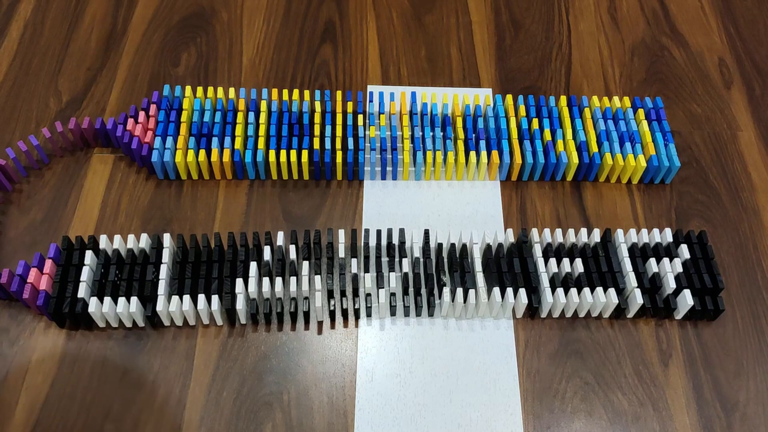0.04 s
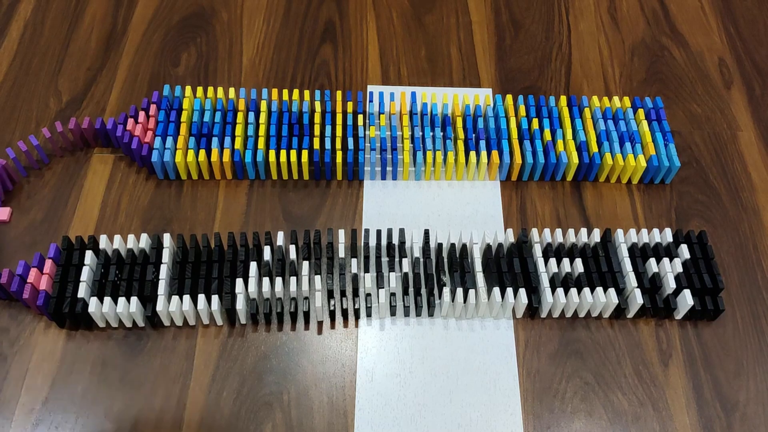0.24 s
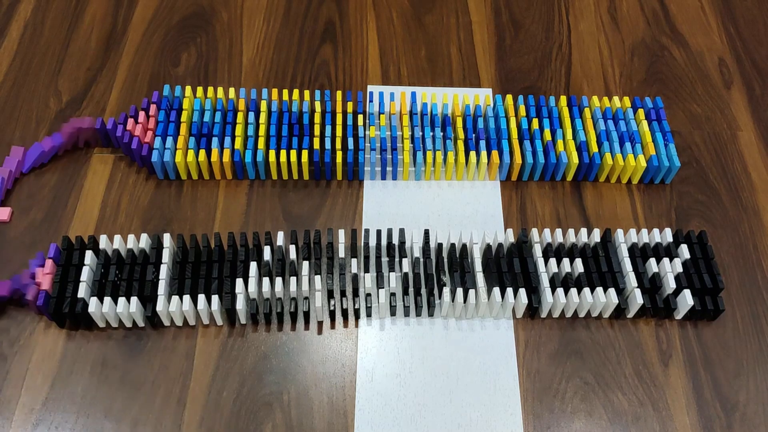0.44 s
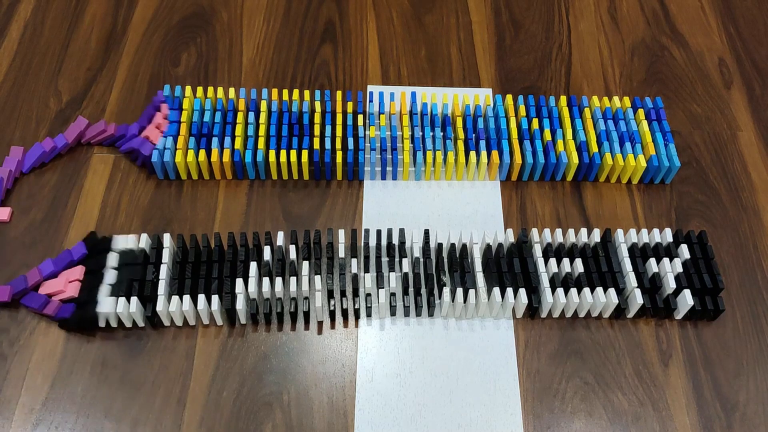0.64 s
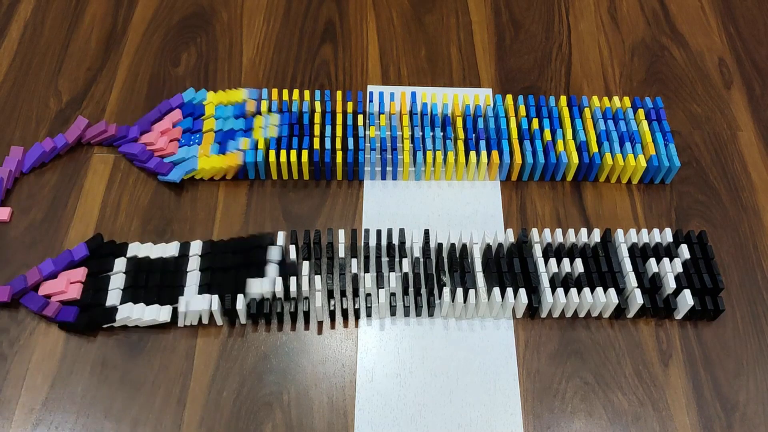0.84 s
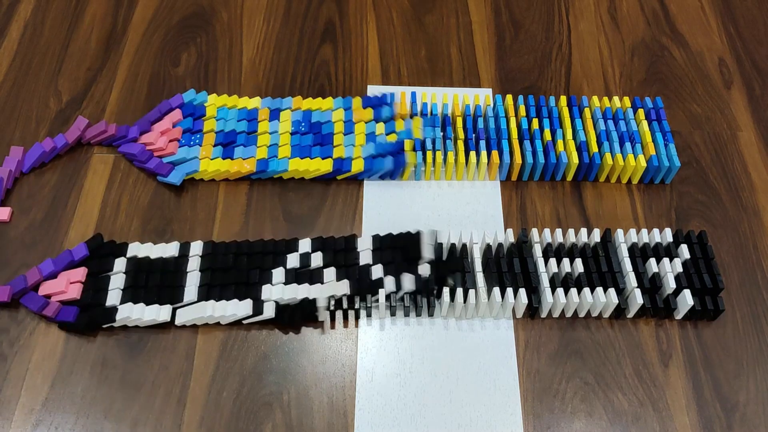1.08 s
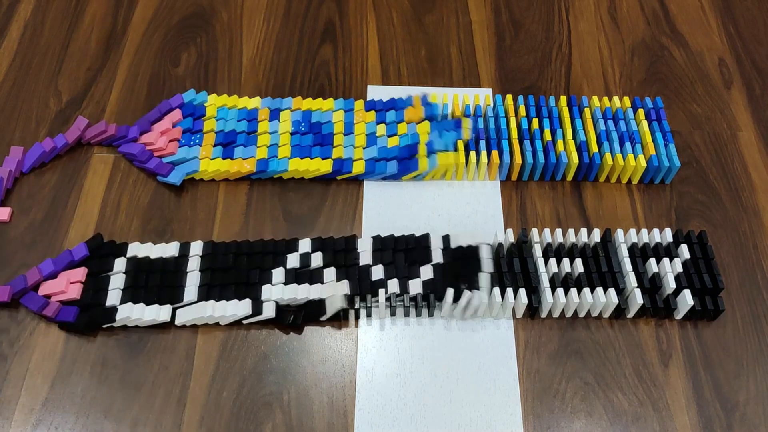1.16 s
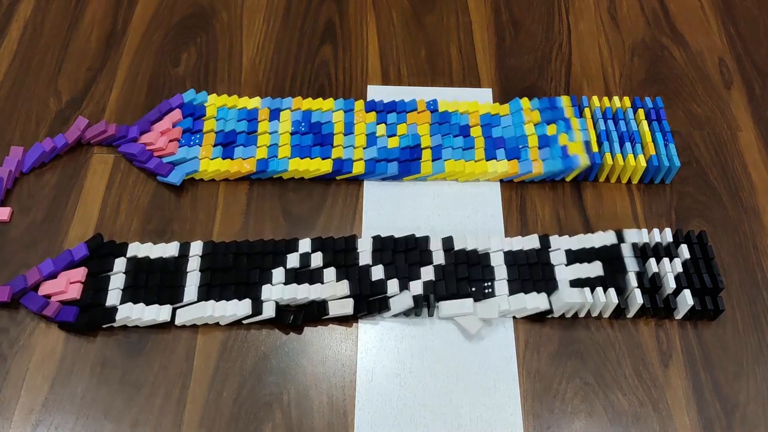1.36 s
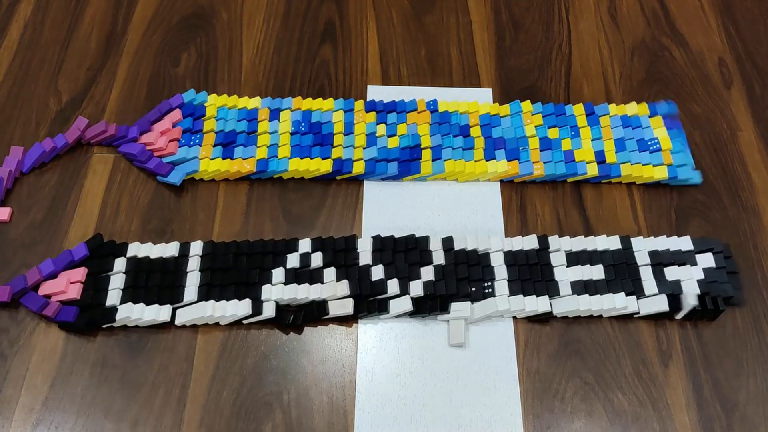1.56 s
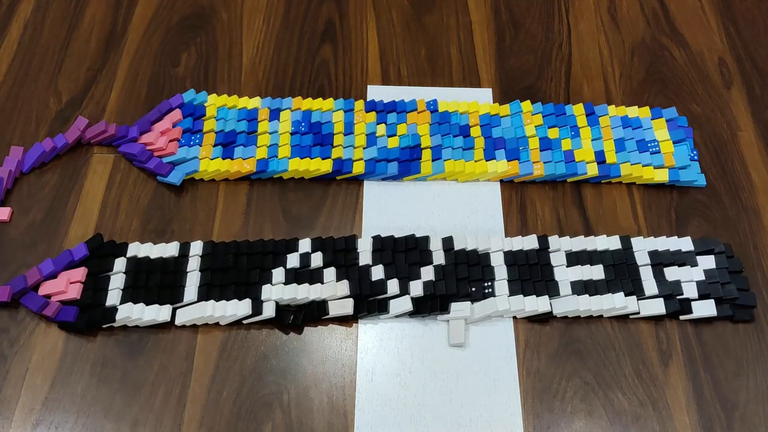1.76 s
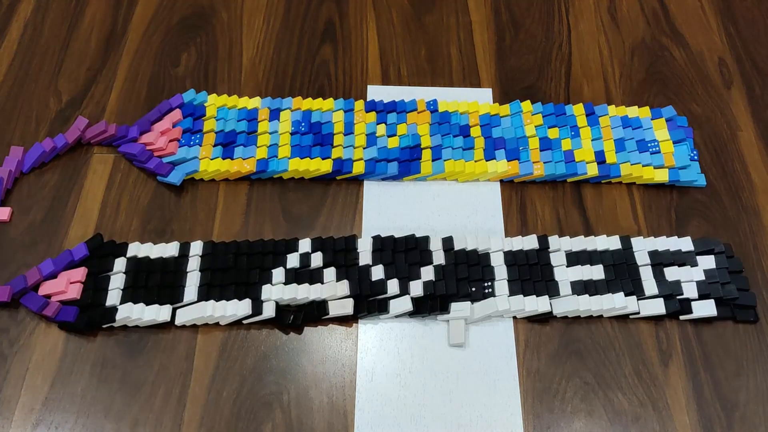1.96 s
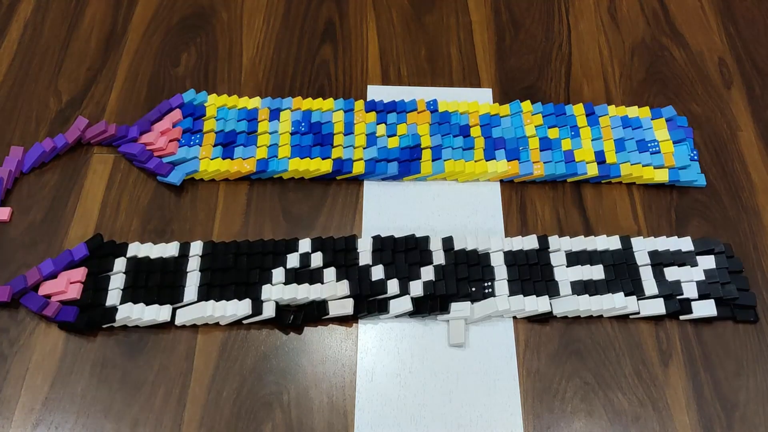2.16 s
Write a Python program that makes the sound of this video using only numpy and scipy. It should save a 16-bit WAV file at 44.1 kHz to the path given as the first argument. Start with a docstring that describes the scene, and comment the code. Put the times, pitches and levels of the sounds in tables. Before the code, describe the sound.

Hundreds of plastic dominoes topple across a wooden floor, thin ticks swelling into a dense bright clatter moving left to right, then last tiles slap down and one rattles to rest in a live room, stereo.

```python
"""A thin ticking swells into a dense clatter: plastic dominoes topple across a wooden floor,
from left to right, as single feeder rows fan out into two wide fields in a live room.
The last rows slap onto the boards, one loose tile rattles to rest, and the room rings out.
Clicks and scuffs are short noise bursts, pings and rings are fading sines, the floor's
shudder is deep noise, and the room is a set of fading noise tails."""
import sys
import numpy as np
from scipy import signal
from scipy.fft import rfft, irfft
from scipy.io import wavfile

SR = 44100
rng = np.random.default_rng(int(sys.argv[2]) if len(sys.argv) > 2 else 0)


def transcribe(u):
    """Save the signal u as a 16-bit wav file named by the first command-line argument.

    u: samples, shape (n,) or (channels, n), limited to [-1, 1]; the rate is SR.
    q: integer samples, one column per channel.
    """
    v = np.clip(np.atleast_2d(u).T, -1, 1)
    q = np.round(v * 32767).astype(np.int16)
    wavfile.write(sys.argv[1], SR, q)


N = 98034  # length [samples]
TIME = np.arange(N) / SR  # [s]


def amp(db):
    """Turns decibels into a gain."""
    return 10 ** (np.asarray(db) / 20)


def unit(x):
    """Scales each sound to energy 1."""
    energy = np.sum(x ** 2, -1, keepdims=True)
    return x / np.sqrt(energy + 1e-20)


def along(points, t=TIME):
    """Reads a curve at the given times, with straight lines between its points."""
    return np.interp(t, *np.transpose(points))


def across(points, hz):
    """Reads a curve over pitch, evenly by octaves as the ear hears it."""
    f, value = np.transpose(points)
    return np.interp(np.log(hz + 1), np.log(f), value)


def convolve(x, h):
    """Lets every sample of x set off the response h, cut to the scene's length."""
    return signal.fftconvolve(np.atleast_2d(x), np.atleast_2d(h), axes=1)[:, :N]


def colour(points, tilt_db=0, size=2048):
    """Makes an impulse of energy 1 with the given spectrum, tilted in dB per octave about 5 kHz."""
    hz = abs(np.fft.fftfreq(size, 1 / SR))
    octaves = np.log2(np.maximum(hz, 1000) / 5000)  # the tilt stops changing below 1 kHz
    level_db = across(points, hz) + tilt_db * octaves
    level_db = level_db - 30 * (hz > 16500)
    log_gain = np.log(amp(level_db))
    # this choice of phase makes the impulse start at once (minimum phase)
    spectrum = np.exp(np.conj(signal.hilbert(log_gain)))
    return unit(np.fft.ifft(spectrum).real[:size // 2])


CONTACT_S = 0.00032  # fading time of a small contact [s]


def contacts(decay_s, count=400, size=256):
    """Makes brief rough contacts as fading noise, no two alike."""
    fade = np.exp(-np.arange(size) / SR / decay_s)
    return unit(rng.standard_normal((count, size)) * fade)


# where the toppling front is: (time [s], delay of the left microphone behind the right [samples])
FRONT_PLACE = [(0, -13.5), (.7, -9.5), (.95, -5.5), (1.3, -1), (1.7, 6.5), (1.87, 11)]


def add(mix, s, sound):
    """Places one sound at the front: the nearer microphone hears it first."""
    lag = along(FRONT_PLACE, s) / 2
    for channel, shift in zip(mix, (lag, -lag)):
        start = max(round(s * SR + shift), 0)
        part = channel[start:][:len(sound)]
        part += sound[:len(part)]


# how often tiles collide: (time [s], rate [collisions per second])
COLLISION_RATE = [(0, 128.5), (.25, 612), (.55, 591), (.8, 1420), (1.05, 3790), (1.7, 3800), (1.85, 610)]
PLACE_SPREAD = 1.5  # scatter of the delay between the microphones [samples]


def collisions(level, shapes, spread_db):
    """Scatters collisions of random strength at the front's rate and place; each rings one shape."""
    size, jitter = rng.standard_normal(N), rng.standard_normal(N)
    late, pick = rng.random(N), rng.integers(0, len(shapes), N)
    rate = np.maximum(along(COLLISION_RATE), 1)
    fallen = np.cumsum(rate) / SR  # collisions counted so far
    n = int(fallen[-1])
    at = np.searchsorted(fallen, np.arange(n) + late[:n])
    strength = amp(spread_db * np.clip(size[:n], -2, 2))
    # crowded collisions are made weaker, so that the level follows its own curve
    crowding = np.sqrt(SR / rate[at] / np.mean(strength ** 2))
    strength *= amp(along(level)[at]) * crowding
    lag = (along(FRONT_PLACE)[at] + PLACE_SPREAD * jitter[:n]) / 2
    length = shapes.shape[1]
    out = np.zeros((2, N + 2 * length))
    for channel, shift in zip(out, (lag, -lag)):
        starts = np.maximum(np.round(at + shift).astype(int), 0)
        for i, gain, k in zip(starts, strength, pick):
            channel[i:i + length] += gain * shapes[k]
    return out[:, :N]


# clicks of tile on tile: (time [s], level [dB])
CLICK_LEVEL = [(0, -86), (.14, -68.5), (.2, -56), (.27, -46.5), (.34, -57), (.5, -50), (.6, -45.5),
               (.65, -39.5), (.78, -38.5), (.86, -30), (.94, -25), (1.04, -24.5), (1.14, -23), (1.28, -22),
               (1.48, -21.5), (1.66, -22.5), (1.74, -33.5), (1.8, -32), (1.9, -41.5), (2.0, -47),
               (2.08, -94)]
# colour of the clicks: (frequency [Hz], relative level [dB])
CLICK_COLOUR = [(100, -52), (300, -21.5), (600, -6), (1100, -5), (2200, -1), (3200, -2.5), (4300, -1),
                (5100, -6), (6700, -5), (7500, -9), (8600, -10), (9800, -17), (11700, -17), (13000, -19.5),
                (15600, -22.5)]


def clatter():
    """Hard plastic clicks of tile on tile: many short noise bursts, coloured alike."""
    hits = collisions(CLICK_LEVEL, contacts(CONTACT_S), spread_db=5.5)
    return convolve(hits, colour(CLICK_COLOUR))


PING_DB, PING_S = -6, 0.00047  # ping against the crack [dB], time to the ping's peak [s]


def clacks(table, points, scuff_s, scuff_db, size=512):
    """Blows that stand out of the clatter: a crack, a short scuff and a ping."""
    out, t = np.zeros((2, N)), np.arange(size) / SR
    scuffs = contacts(scuff_s, count=len(table), size=size)
    for (s, db, tilt_db, hz), scuff in zip(table, scuffs):
        blow = (t == 0) + amp(scuff_db) * scuff  # one sharp sample, then noise
        crack = np.convolve(blow, colour(points, tilt_db))[:size]
        ping = np.sin(2 * np.pi * hz * t) * t * np.exp(-t / PING_S)
        clack = unit(unit(crack) + amp(PING_DB) * unit(ping))
        add(out, s, amp(db) * clack)
    return out


# the last rows landing flat: (time [s], level [dB], treble tilt [dB per octave], ping [Hz])
SLAP_EVENTS = [(1.6825, 1, -1, 5600), (1.695, 2, -1, 5700), (1.7071, 9.5, -.3, 6740),
               (1.7097, 9.5, .5, 5600), (1.714, 8.5, -3, 3700), (1.718, 5.5, -2, 3600),
               (1.7275, 10.5, -.6, 5600), (1.7295, 11.5, -.6, 6500), (1.763, 0, -1, 4900),
               (1.992, -13, -5, 3100)]
# colour of the slaps before the tilt: (frequency [Hz], relative level [dB])
SLAP_COLOUR = [(200, -25), (600, -15.5), (1200, -12.5), (2600, -8.5), (3700, 5), (5000, 3), (5700, 3),
               (6900, -1), (7800, -1.5), (10000, -8.5), (15600, -22)]


def slaps():
    """Tiles of the last rows slap flat onto the boards, with a strong noisy scuff."""
    return clacks(SLAP_EVENTS, SLAP_COLOUR, scuff_s=0.002, scuff_db=5.5)


# single tiles striking hard: (time [s], level [dB], treble tilt [dB per octave], ping [Hz])
TICK_EVENTS = [(.076, -53, -4, 4500), (.109, -51, -2, 5000), (.1651, -43, 0, 4200), (.193, -31, 4, 4200),
               (.215, -34, -4, 12100), (.329, -39, 2, 8550), (.372, -10.5, -2, 5120),
               (.3885, -22, -5, 5200), (.394, -19, -4.5, 6970), (.4943, -32, -3, 7900),
               (.5502, -20.5, 7, 9050), (.6155, -8.5, 0, 3930), (.662, -18, -9, 9200), (.683, -23, 3, 8800),
               (.7383, -14, 10, 12010), (.7976, -14, 6, 11700), (.8181, -14, -12, 10500),
               (.8345, -11.5, 11, 10600), (.8884, -25, 0, 4080), (1.472, 5, 1, 4100), (1.578, 5, -1, 6405),
               (1.864, 0, 6, 4300), (1.9835, -7.5, 6, 6560)]
# colour of the ticks before the tilt: (frequency [Hz], relative level [dB])
TICK_COLOUR = [(200, -22), (600, -18), (1500, -6), (3000, -7), (4800, 2.5), (7200, -1.5), (9500, -7.5),
               (12000, -14), (15600, -14)]


def ticks():
    """Single tiles strike hard, with a shorter and weaker scuff than the slaps."""
    return clacks(TICK_EVENTS, TICK_COLOUR, scuff_s=0.00092, scuff_db=-3.5)


# tiles knocking on the boards: (time [s], level [dB])
KNOCK_LEVEL = [(0, -94), (.15, -76), (.26, -56.5), (.44, -57), (.52, -48), (.66, -47.5), (.8, -47),
               (.95, -41.5), (1.2, -34.5), (1.55, -38.5), (1.72, -32), (1.8, -45.5), (1.9, -56), (2.1, -78)]
# colour of the boards: (frequency [Hz], relative level [dB])
BOARD_COLOUR = [(40, -25), (100, -19), (170, -30.5), (280, -18.5), (400, -5.5), (490, -2), (620, 4),
                (800, -1.5), (1100, -9), (2500, -35), (8000, -79)]


def boards():
    """Hollow knocks of the tiles' edges on the wood: noise bursts in the colour of the boards."""
    hits = collisions(KNOCK_LEVEL, contacts(CONTACT_S), spread_db=4.0)
    return convolve(hits, colour(BOARD_COLOUR))


# ring of tiles that swing free: (time [s], level [dB])
RING_LEVEL = [(0, -102), (.25, -60), (.8, -67), (1.0, -32), (1.12, -41), (1.22, -31), (1.29, -31),
              (1.36, -31), (1.42, -22.5), (1.49, -29), (1.55, -44), (1.68, -54), (1.8, -70), (2.0, -95)]
# tones of a ringing tile: (frequency [Hz], relative level [dB], time to fade by 60 dB [s])
TILE_MODES = [(2226, -36, 0.075), (4108, 6.5, 0.02), (5810, -4, 0.09), (6580, 2, 0.045), (7800, -5, 0.045),
              (11800, -18, .012)]


def ringing(count=80, size=1500):
    """Tiles that swing free ring briefly as fading sines, each a little off the common pitch."""
    t = np.arange(size) / SR
    detune = 1 + 0.002 * rng.standard_normal((count, 1))
    sign = rng.choice([-1, 1], (count, 1))
    shapes = 0
    for hz, db, t60 in TILE_MODES:
        tone = amp(-60 * t / t60) * np.sin(2 * np.pi * hz * detune * t)
        shapes = shapes + amp(db) * unit(tone)
    return collisions(RING_LEVEL, unit(sign * shapes), spread_db=4)


# thin high chinks of sharp corners: (time [s], level [dB])
CHINK_LEVEL = [(0, -110), (.15, -85), (.23, -56), (.32, -80), (.5, -75), (.6, -55), (.68, -51), (.75, -61),
               (.83, -46), (.92, -48), (1.04, -31.5), (1.15, -37), (1.27, -32), (1.38, -37.5),
               (1.45, -27.5), (1.52, -43), (1.62, -32.5), (1.72, -27.5), (1.78, -42), (1.9, -87)]
# pitches the corners ring at: (frequency [Hz], relative level [dB], time to fade by 60 dB [s])
CORNER_MODES = [(8050, -0.5, 0.017), (8800, 0, 0.0077), (10500, -2.5, 0.0075), (11700, 0.5, 0.012),
                (13100, -0.5, 0.016), (14600, -1.5, .008)]


def chinks(count=12, size=700):
    """Corners catch and give a thin, high ping: one fading sine for each, slightly detuned."""
    t = np.arange(size) / SR
    hz, db, t60 = np.repeat(CORNER_MODES, count, axis=0).T[:, :, None]
    detune = 1 + 0.02 * rng.standard_normal(hz.shape)
    sign = rng.choice([-1, 1], hz.shape)
    tones = amp(-60 * t / t60) * np.sin(2 * np.pi * hz * detune * t)
    return collisions(CHINK_LEVEL, sign * amp(db) * unit(tones), spread_db=7)


# clinks of the loose tile rocking to rest, some of them probably its echoes off the room:
# (time [s], level before left-right balance [dB], pitch [Hz])
CLINK_EVENTS = [(1.823, -1.5, 4470), (1.844, -0.5, 4170), (1.864, 9.5, 4410), (1.8679, 2.5, 4360),
                (1.88, -3, 4330), (1.884, -9, 4470), (1.896, -11, 4400), (1.914, -8, 4380),
                (1.925, -9, 4700), (1.953, -13, 4400), (1.968, -10, 4530), (1.9856, -13, 4630),
                (1.998, -10.5, 4700), (2.01, -20, 4800), (2.026, -14, 4700), (2.053, -30, 4570),
                (2.073, -25, 4510), (2.095, -32, 4660), (2.123, -40, 4950)]
# tones in each clink: (multiple of the pitch, relative level [dB])
CLINK_TONES = [(1, -2), (1.38, -19), (2.04, -21.5)]
CLINK_S = 0.00046  # each clink swells and fades, peaking at twice this time [s]


def loose_tile(size=600):
    """Short pitched clinks of one rocking tile, some probably echoes; they mostly weaken and rise."""
    out, t = np.zeros((2, N)), np.arange(size) / SR
    swell = (t / CLINK_S) ** 2 * np.exp(-t / CLINK_S)
    for s, db, hz in CLINK_EVENTS:
        tone = sum(amp(mode_db) * np.sin(2 * np.pi * hz * k * t) for k, mode_db in CLINK_TONES)
        add(out, s, amp(db) * unit(tone * swell))
    return out * amp([[-1.5], [1]])  # left, right [dB]


# deep shudder of the floor: (time [s], level [dB])
SHUDDER_LEVEL = [(0, -74), (.18, -67), (.4, -55), (.7, -52.5), (.85, -53), (1.0, -45.5), (1.55, -47),
                 (1.75, -48), (1.92, -46.5), (2.13, -43.5), (2.22, -48.5)]
# colour of the shudder: (frequency [Hz], relative level [dB])
SHUDDER_COLOUR = [(10, -5), (24, -10), (32, 0.5), (43, -19.5), (63, -15), (85, -21.5), (120, -27),
                  (170, -32.5), (300, -33), (600, -59.5)]
# how much left and right differ: (frequency [Hz], difference against the shared part [dB])
SHUDDER_SIDE = [(25, -20), (60, -20), (150, -11), (400, -6)]


def shudder():
    """The floor trembles under the falling mass: deep noise, nearly alike on both sides."""
    hz = np.fft.rfftfreq(N, 1 / SR)
    mid, side = rfft(rng.standard_normal((2, N))) * amp(across(SHUDDER_COLOUR, hz))
    side = side * amp(across(SHUDDER_SIDE, hz))
    noise = irfft(np.array([mid + side, mid - side]), N)
    steady = unit(noise) * np.sqrt(N)  # average power 1
    return steady * amp(along(SHUDDER_LEVEL))


ECHO_CHANGE_S = 0.09  # time from one echo pattern to the next [s]


def room(x, wet_db, count=4):
    """Direct sound plus the room, whose echo patterns fade into one another in a cycle."""
    wet = 0
    for k in range(count):
        away = abs((TIME / ECHO_CHANGE_S - k + count / 2) % count - count / 2)
        share = np.cos(np.pi / 2 * np.minimum(away, 1))
        wet = wet + convolve(x * share, tail())
    return (x + amp(wet_db) * wet) / np.hypot(1, amp(wet_db))


# how long the room rings: (frequency [Hz], time to fade by 60 dB [s])
ROOM_FADE = [(100, 0.71), (500, 0.64), (1200, 0.56), (3000, 0.66), (4400, 0.45), (6000, 0.47), (9000, 0.31),
             (15000, 0.21)]
MIC_GAP_S = 0.00037  # travel time of sound between the microphones [s]


def tail(size=36000):
    """Early echoes and a diffuse tail of sparse noise, shared by the microphones in the bass."""
    t = np.arange(size) / SR
    taps = rng.standard_normal((2, size)) * (rng.random((2, size)) < .15) * (t > .003)
    early = 1 + amp(-10) * 2 * np.exp(-t / 0.011)  # stronger first echoes
    hz, frame_s, z = signal.stft(taps * early, SR, nperseg=256)
    same = np.sinc(2 * hz * MIC_GAP_S)[:, None]  # likeness of the two sides
    z[1] = same * z[0] + np.sqrt(1 - same ** 2) * z[1]
    fade = amp(-60 * frame_s / across(ROOM_FADE, hz)[:, None])
    return unit(signal.istft(z * fade, SR, nperseg=256)[1])


def scene():
    """All the tiles in the room, over the trembling floor."""
    rows = clatter() + boards() + ringing() + chinks()
    hard_ticks = ticks()
    flat_slaps = slaps()
    tiles = room(rows, wet_db=3) + room(hard_ticks, wet_db=3.5)
    tiles = tiles + room(flat_slaps, wet_db=4.5) + room(loose_tile(), wet_db=-1)
    return tiles + shudder()


EDGE_HZ = 15780  # upper limit of the microphones' band [Hz]


def record(dry):
    """A slightly stronger right microphone, then a filter that removes the highest treble."""
    balanced = dry * amp([[-.3], [.3]])  # left, right [dB]
    low_pass = signal.firwin(611, EDGE_HZ, window=("kaiser", 9), fs=SR)
    return signal.oaconvolve(balanced, low_pass[None], "same")


dry = scene()
out = record(dry)
transcribe(out)
```